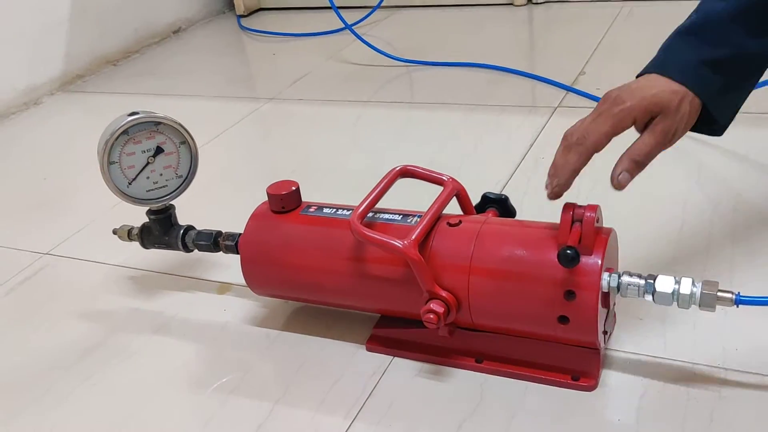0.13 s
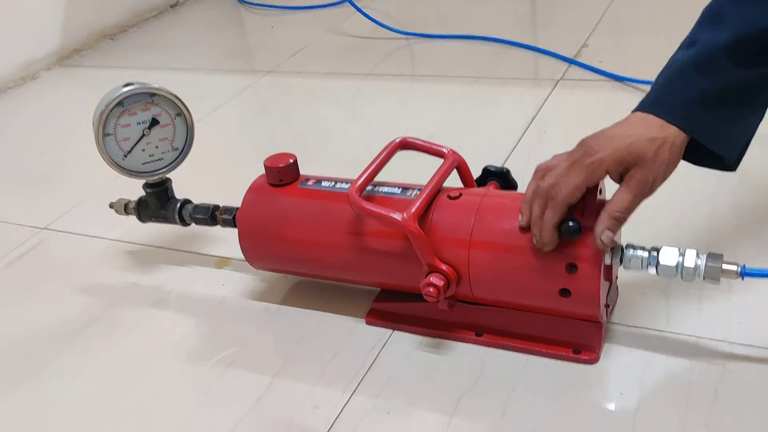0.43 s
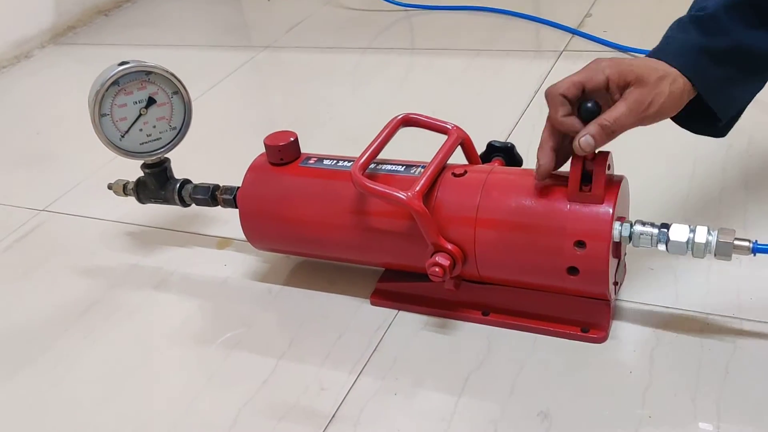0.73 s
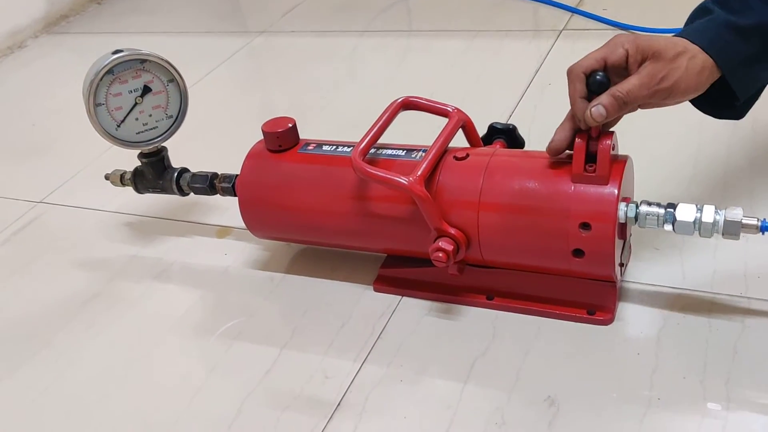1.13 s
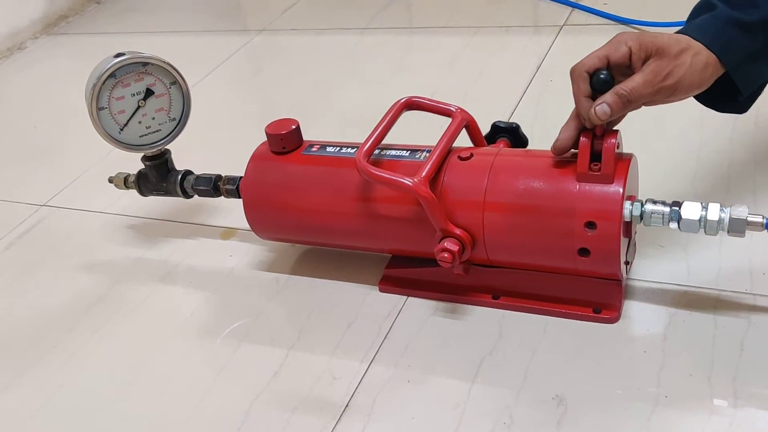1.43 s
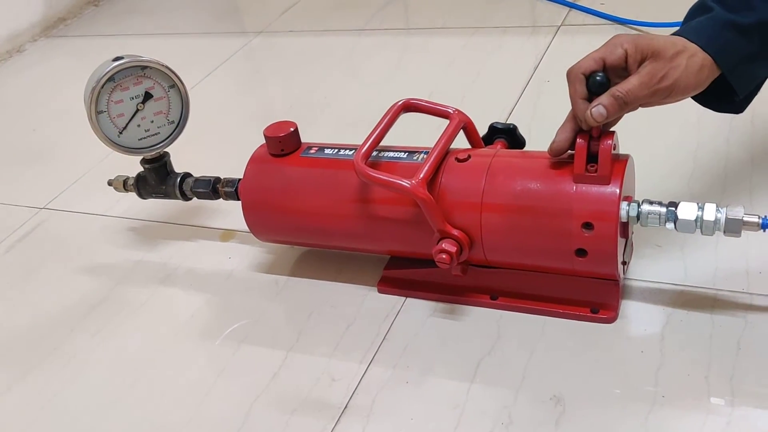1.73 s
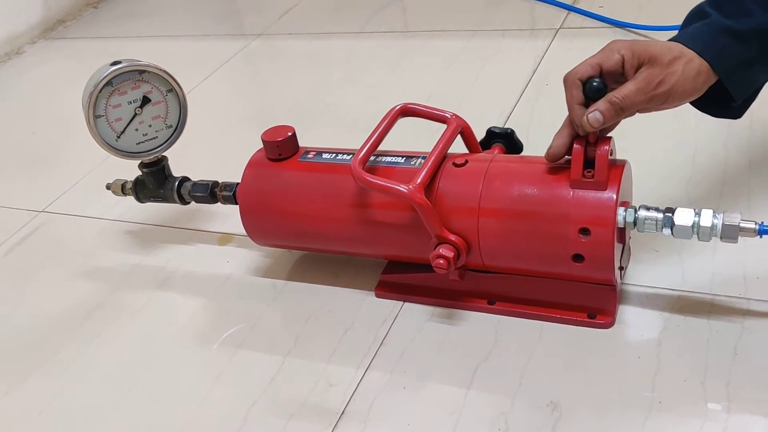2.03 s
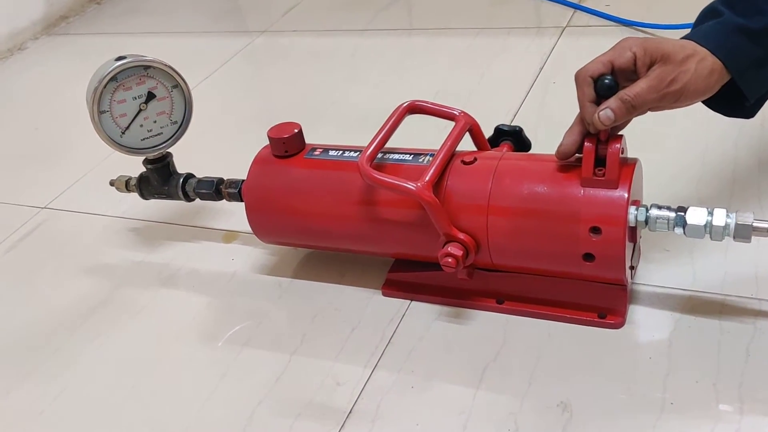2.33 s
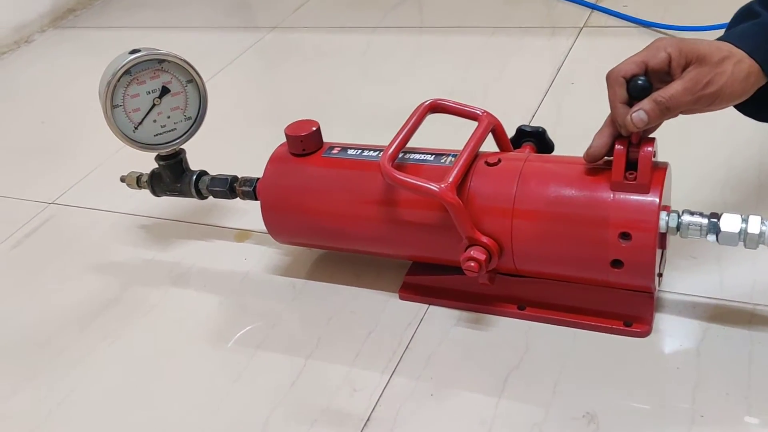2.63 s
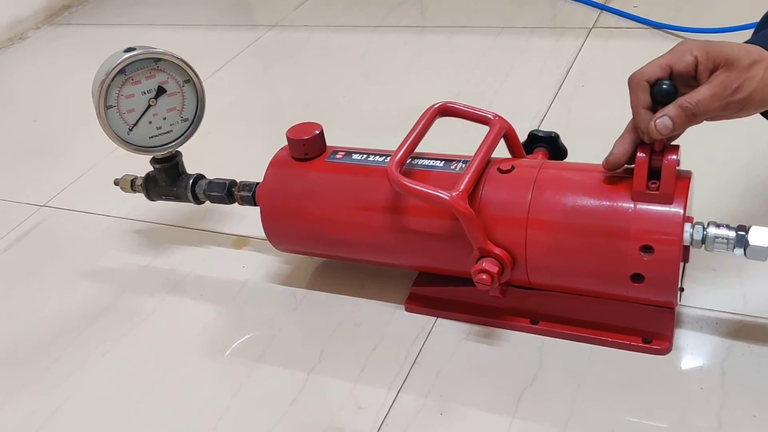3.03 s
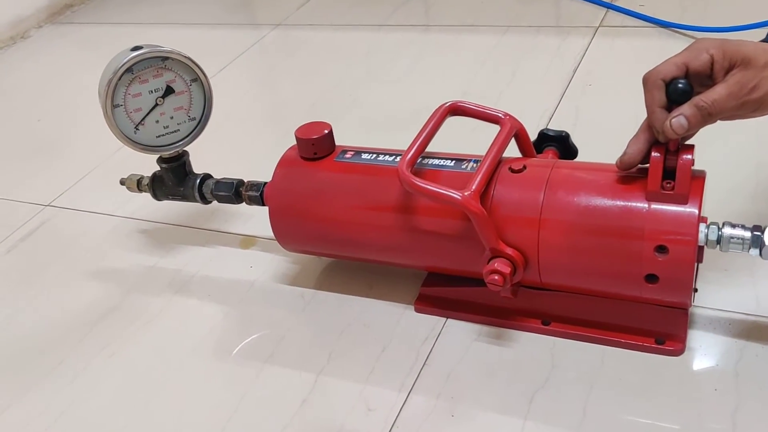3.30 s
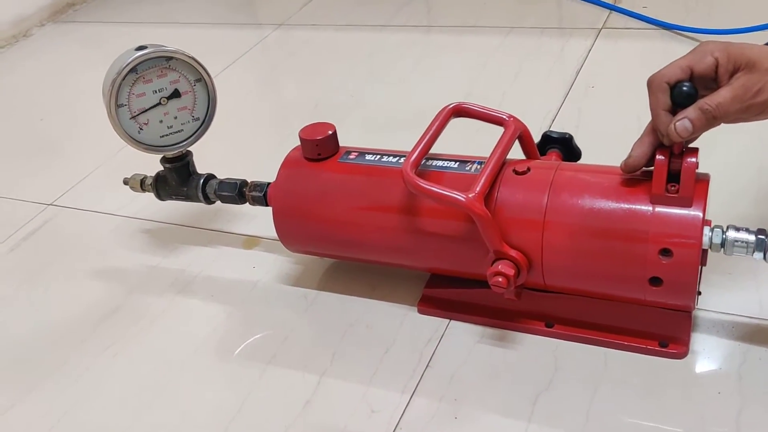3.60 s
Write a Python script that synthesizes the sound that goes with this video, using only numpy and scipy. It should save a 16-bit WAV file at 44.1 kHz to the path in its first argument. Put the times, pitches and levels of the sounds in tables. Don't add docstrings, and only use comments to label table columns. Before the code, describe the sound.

Low machinery hum and a soft cloth swish come first, then air rushes in and a pneumatic pump chugs loudly, about six strokes a second, echoing off tiles, with the phone microphone compressing each blast.

```python
import sys
import numpy as np
from scipy import signal
from scipy.fft import rfft, irfft, next_fast_len
from scipy.io import wavfile
from scipy.ndimage import uniform_filter1d

SR = 44100
rng = np.random.default_rng(int(sys.argv[2]) if len(sys.argv) > 2 else 0)


def voltage_ratio(level):
    return 10 ** (np.asarray(level, float) / 20)


def digitize_waveform(pressure):
    field = np.atleast_2d(pressure).T
    bounded = np.clip(field, -1, 1)
    quanta = np.round(bounded * 32767).astype(np.int16)
    wavfile.write(sys.argv[1], SR, quanta)


N = 165816
T = np.arange(N) / SR
KNOCK_DELAY_S = 0.038
HUSH_S = 0.02

# [f/Hz, level/dB per Hz]
ROOM_COLOUR = [(20, -18), (55, -12), (85, -25), (180, -13), (300, -12), (873, -22), (7950, -37),
               (16000, -58)]
# [f/Hz, width/Hz, level/dB]
MACHINE_TONES = [(30.5, 15, -46), (106, 14.3, -42.5), (130.5, 14.5, -41), (173, 31, -41.5),
                 (198, 30, -40.5), (391, 14, -49.5), (1900, 210, -56)]
# [t/s, f/Hz, level/dB]
MOTOR_LOAD = [(0.01, 202.6, -35), (0.066, 194, -46), (0.096, 192.8, -35.5), (0.29, 204.4, -28),
              (0.51, 201.8, -34.5), (0.6, 192, -38), (0.858, 198, -31.5), (1.089, 192, -38.5),
              (1.3, 200, -41), (2.3, 193.2, -39), (3.7, 196, -36)]
# [f/Hz, level/dB]
MACHINE_WHINES = [(279.9, -48), (323, -52), (382.2, -52), (532.9, -54), (1308, -53), (1938, -60),
                  (2035, -61)]
# [f/Hz, likeness/-1..1]
STEREO_LIKENESS = [(60, 0.96), (180, 1), (550, 0.55), (1650, -0.2), (4970, 0.035), (15000, -0.24)]
# [f/Hz, width/Hz, level/dB]
CLOTH = [(2630, 470, -3.5), (3560, 900, -3), (5600, 2900, -1), (8300, 1800, -2.5), (11900, 2400, -18)]
# [t/s, level/dB, f/Hz, t60/s]
DULL_TAPS = [
    (.508, -29, 753, 0.062),
    (1.4, -29, 620, .05),
    (3.596, -4, 980, 0.014),
    (4.4, -1, 1820, .02),
    (1.9, -18, 2400, .02),
]
# [f/Hz, width/Hz, level/dB]
SUPPLY_LINE = [(740, 290, -14.5), (2420, 1050, -10), (3840, 490, -0.5), (4830, 270, -11.5),
               (5900, 450, -11), (6960, 470, -8), (8300, 500, -14), (9180, 690, -4), (9500, 460, -10),
               (10500, 440, -19), (12240, 960, -13.5), (14500, 400, -28)]
# [blast t/s, blast level/dB, knock level/dB, groan level/dB, share of the usual fading]
PUMP_STROKES = [(1.2523, -1.5, 1.5, 4, 0.77), (1.4096, 0, -0.5, -3, 1.27), (1.5672, -2.5, -0.5, 4, 0.64),
                (1.7262, 1.5, 3, 4.5, 1.24), (1.8845, -0.5, -2, -4, 1.16), (2.0456, 0.5, 0, 0, 1.24),
                (2.2055, 2, 1, 3, 1.24), (2.3686, 1.5, 0.5, 3, 1.2), (2.5304, -0.5, 1.5, 2, 0.86),
                (2.6917, -1, 0, -1, 1.02), (2.857, 3.5, 2, 5, 1.21), (3.024, 1.5, 1, 2.5, 1.2),
                (3.194, 2.5, 2, 7, 1.19), (3.3774, 2, 0.5, 6, 1.14), (3.592, 3.5, -2, 3.5, 0.84)]
GROAN_ROUGHNESS = (.2, .4)
# [f/Hz, level/dB, t60/s]
BODY_MODES = [(158.5, -4.5, 0.047), (438.8, -12.5, 0.2), (502, -5, 0.034), (610, -5.5, 0.04),
              (773, 3, 0.014), (887, -1, 0.047), (929, 1, 0.03)]
# [delay t/s, level/dB]
WALL_ECHOES = [(0, 5), (.0078, 0), (.018, -6), (.031, -7), (.045, 1), (.054, -9), (.065, -3), (.085, -1),
               (.102, -6)]
# [f/Hz, level/dB per Hz]
JET_COLOUR = [(300, -14.5), (1350, -19), (1850, -12.5), (2900, -3.5), (4400, -4.5), (6000, -2.5),
              (9000, -1), (15000, -16)]
# [f/Hz, width/Hz, level/dB]
JET_WHISTLES = [(3010, 360, -23.5), (3870, 300, -22.5), (5570, 230, -21), (5860, 190, -20.5),
                (6590, 100, -20), (7820, 370, -39), (8200, 810, -18), (9200, 230, -30)]
# [f/Hz, fall/dB per s]
JET_FADE = [(500, 31), (1500, 48), (3000, 71), (6000, 53), (9000, 74.5), (14000, 86)]
SECOND_PUFFS = [1.3, 1.36, 0.81, 1.1, 0.35, 1.44, 0.9, 0.45, 1.3, 1.4, 0.93, 1.03, 0.69, 1.3, 0.5]
# [f/Hz, left level/dB, right level/dB]
MIC_PORTS = [(1880, -2.5, -1), (5030, -2, 2), (5740, 2.5, 2), (6580, 5, -0.5), (7400, -6, 5.5),
             (7940, -10, 9.5), (9700, -14, 4.5), (15200, -0.5, 9)]


def rms_one(x):
    return x / np.sqrt(np.mean(x ** 2) + 1e-20)


def at_hz(points, hz, index=1):
    points = np.array(points)
    return np.interp(np.log(hz), np.log(points[:, 0]), points[:, index])


def drift(rate):
    r = np.exp(-80 * np.pi * rate / SR)
    slow = signal.lfilter([1], [1, -2 * r, r * r], rng.standard_normal(N // 40 + 2002))[2000:]
    return np.interp(np.arange(N) / 40, np.arange(len(slow)), rms_one(slow))


def stereo_noise(spectrum_db):
    hz = np.arange(N // 2 + 1) * SR / N + 1
    mid, side = rfft(rng.standard_normal((2, N)))
    alike = np.clip(at_hz(STEREO_LIKENESS, hz), -1, 1)
    both = np.sqrt(1 + alike) * mid + np.sqrt(1 - alike) * side * [[1], [-1]]
    return irfft(voltage_ratio(spectrum_db(hz)) * both, N)


def resonant_noise(rows):
    def spectrum_db(hz):
        power = sum(voltage_ratio(2 * db) / width * np.exp(-2.8 * ((hz - centre) / width) ** 2)
                    for centre, width, db in rows)
        return 10 * np.log10(power * SR / 2 + 1e-20)
    return stereo_noise(spectrum_db)


def gliding_noise(hz, wobble, rough):
    turn = 2 * np.pi * np.cumsum(hz) / SR
    in_phase = 1 - rough + rough * drift(wobble)
    return in_phase * np.cos(turn) + rough * drift(wobble) * np.sin(turn)


def ring(clicks, hz, t60):
    r, w = voltage_ratio(-60 / (t60 * SR)), 2 * np.pi * hz / SR
    return signal.lfilter([0, np.sin(w)], [1, -2 * r * np.cos(w), r * r], clicks + 1e-18)


def clicks_at(seconds, db):
    out = np.zeros(N + SR)
    np.add.at(out, (np.ravel(seconds) * SR).astype(int), voltage_ratio(np.ravel(db)))
    return out[:N]


def stroke_clock(delay):
    s = np.array(PUMP_STROKES)[:, 0]
    k = np.clip(np.searchsorted(s + delay, T) - 1, 0, None)
    return np.clip(T - s[k] - delay, 0, None), k, np.append(s, 9.0)[k + 1] - T


def off_tiles(spectrum):
    tile_db, tile_t60_s = -6.5, 0.12
    age = T[:SR // 5]
    echoes = rms_one(rng.standard_normal((2, SR // 5)) * voltage_ratio(-60 * age / tile_t60_s)) * np.sqrt(5 / SR)
    return spectrum * (1 + voltage_ratio(tile_db) * rfft(echoes, N)) / np.sqrt(1 + voltage_ratio(2 * tile_db))


def hum():
    broad = voltage_ratio(-32.5) * rms_one(stereo_noise(lambda hz: at_hz(ROOM_COLOUR, hz)))
    broad = broad * voltage_ratio(0.11 * drift(1.6))
    s, hz, db = np.transpose(MOTOR_LOAD)
    motor = gliding_noise(np.interp(T, s, hz), wobble=5.9, rough=0.11)
    motor = voltage_ratio(np.interp(T, s, db) + 3.5) * motor
    whines = 0
    for line_hz, level_db in MACHINE_WHINES:
        line = np.array([gliding_noise(line_hz + 0 * T, wobble=2.3, rough=0.25) for _ in "LR"])
        whines = whines + voltage_ratio(level_db + 8) * line
    return broad + resonant_noise(MACHINE_TONES) + motor + whines


def swish():
    peak_s, rise_s, fall_s, cloth_db = 0.32, 0.075, 0.083, -41.5
    squeak_start_s, squeak_end_s, squeak_db = 0.19, 0.35, -47
    shape = np.exp(-np.abs(T - peak_s) / np.where(T < peak_s, rise_s, fall_s))
    flick_db = 1.5 * np.exp(-((T - 0.335) / 0.014) ** 2)
    cloth = voltage_ratio(cloth_db + flick_db + 1.3 * drift(6.3)) * shape * resonant_noise(CLOTH)
    gate = np.clip(np.minimum(T - squeak_start_s, squeak_end_s - T) / 0.038, 0, 1)
    squeak_hz = 3780 - 2600 * (T - squeak_start_s)
    squeak = [gliding_noise(squeak_hz, wobble=60.0, rough=1.0) for _ in "LR"]
    return cloth + voltage_ratio(squeak_db) * gate * squeak


def taps():
    return sum(ring(clicks_at([s], [db]), hz, t60) for s, db, hz, t60 in DULL_TAPS)


def inrush():
    start_s, rise_s, level_db = 1.132, 0.19, -27
    opening = np.clip((T - start_s) / rise_s, 0, 1) ** 0.32
    gate = opening * (T < PUMP_STROKES[0][0] + 0.003)
    catch_db = -6 * np.exp(-((T - 1.144) / 0.0048) ** 2)
    hiss = irfft(off_tiles(rfft(resonant_noise(SUPPLY_LINE))), N)
    return voltage_ratio(level_db + catch_db + 0.47 * drift(8.8)) * gate * hiss


def groan():
    level_db, start_hz, sag_hz_per_s, fade_db_per_s, pan_db = -31.5, 927, 900, 32, 8
    since, k, left = stroke_clock(KNOCK_DELAY_S)
    gate = np.clip(since / 0.0057, 0, 1) * np.clip((left - HUSH_S) / 0.0056, 0, 1)
    level = voltage_ratio(level_db + np.array(PUMP_STROKES)[k, 3] - fade_db_per_s * since) * gate
    hz = start_hz - sag_hz_per_s * since
    note = [gliding_noise(hz, wobble=29.0, rough=share) for share in GROAN_ROUGHNESS]
    return level * note * voltage_ratio([[pan_db], [-pan_db]])


def thumps():
    lead_s, level_db = 0.00395, -9.5
    s = np.array(PUMP_STROKES)[:, 0]
    return ring(clicks_at(s - lead_s, level_db + 0 * s), hz=128, t60=0.04)


def pump_body(clicks):
    pulse_db, top_hz = 32, 946
    steep = signal.cheby2(8, 30, top_hz * 1.12, fs=SR, output="sos")
    modes = sum(voltage_ratio(db) * (-1) ** j * ring(clicks, hz, t60) for j, (hz, db, t60) in enumerate(BODY_MODES))
    return signal.sosfilt(steep, -voltage_ratio(pulse_db) * clicks + modes)


def knocks():
    level_db, pan_db, lag_s = -17, 1, 0.0001
    room_db, room_t60_s, hush_db = -10, 1, -5
    s, _, db, _, _ = np.transpose(PUMP_STROKES)
    delay, echo_db = np.transpose(WALL_ECHOES)
    hit = s + KNOCK_DELAY_S
    arrival = hit[:, None] + delay
    arrival_db = db[:, None] + echo_db + rng.normal(0, 1.43, (len(s), len(delay)))
    near = np.array([pump_body(clicks_at(arrival + lag, arrival_db)) for lag in (lag_s, 0)])
    age = T[:SR // 2]
    tail = rng.standard_normal((2, SR // 2)) * voltage_ratio(-60 * age / room_t60_s)
    tail = tail * np.clip(age / 0.062, 0, 1) / np.sqrt(0.019 * SR)
    diffuse = signal.fftconvolve(pump_body(clicks_at(hit, db))[None], tail, axes=1)[:, :N]
    left = stroke_clock(KNOCK_DELAY_S)[2]
    level = voltage_ratio(level_db + hush_db * np.clip((HUSH_S - left) / 0.085, 0, 1))
    return level * (near * voltage_ratio([[pan_db], [-pan_db]]) + voltage_ratio(room_db) * diffuse * 3)


def exhaust():
    level_db, attack_s = -1.5, 0.0015
    spike_db, spike_s, afterblow_db, afterblow_s = 7, 0.0035, 2, 0.005
    puff_peak_db, puff_hz, puff_octaves, puff_s, puff_rise_s = 2.5, 3900, 1, 0.08, 0.012
    s, db, _, _, share = np.transpose(PUMP_STROKES)
    k = np.clip(np.searchsorted(s, T) - 1, 0, None)
    since = np.clip(T - s[k], 0, None)
    before = np.where(k > 0, T - s[k - 1], 9.0)
    opening = 1 - np.exp(-since / attack_s)
    jet = rms_one(stereo_noise(lambda hz: at_hz(JET_COLOUR, hz)))
    jet = jet + sum(resonant_noise([row]) * voltage_ratio(3.73 * drift(14.6)) for row in JET_WHISTLES)
    spectrum = off_tiles(rfft(jet))
    hz = np.arange(N // 2 + 1) * SR / N + 1
    centres = 300 * 2 ** np.arange(0, 6.1, 0.5)
    out, together = 0, drift(25)
    for j, centre in enumerate(centres):
        window = np.interp(np.log(hz), np.log(centres), np.arange(len(centres)) == j)
        band = irfft(spectrum * window, N)
        puff_db = puff_peak_db * np.exp(-(np.log2(centre / puff_hz) / puff_octaves) ** 2)
        puff_db = puff_db * np.array(SECOND_PUFFS)[k]
        fall = at_hz(JET_FADE, centre) * share[k]

        def shape(age):
            burst_db = spike_db * np.exp(-age / spike_s) + afterblow_db * np.exp(-age / afterblow_s)
            return voltage_ratio(burst_db - fall * age + puff_db * np.clip((age - puff_s) / puff_rise_s, 0, 1))

        level = opening * voltage_ratio(db[k]) * shape(since) + (1 - opening) * voltage_ratio(db[k - 1]) * shape(before)
        flutter_db = 0.82 * together + 1.13 * drift(10.6) + 0.25 * drift(2.2)
        out = out + band * level * voltage_ratio(flutter_db)
    return voltage_ratio(level_db) * out


def scene():
    return hum() + swish() + taps() + inrush() + groan() + thumps() + knocks() + exhaust()


def low_pass(x):
    return signal.sosfilt(signal.butter(12, 16350, fs=SR, output="sos"), x)


def record(dry):
    cutoff_hz, top_hz, top_db_per_khz = 16300, 15100, 15
    knee_db, squeeze, release_db_per_s = [[-17.5], [-18]], 0.61, 69.5
    sense_s, glide_s, ahead_s = 0.0018, 0.001, 0.0057
    size = next_fast_len(N + 4096)
    hz = np.arange(size // 2 + 1) * SR / size + 1
    ports_db = np.array([at_hz(MIC_PORTS, hz, index=1), at_hz(MIC_PORTS, hz, index=2)])
    ports_db = ports_db - top_db_per_khz * np.clip(hz - top_hz, 0, None) / 1000
    x = irfft(rfft(dry, size) * voltage_ratio(ports_db) * (hz < cutoff_hz), size)[:, :N]
    level_db = 10 * np.log10(np.abs(uniform_filter1d(x ** 2, int(sense_s * SR))) + 1e-12)
    release_db = release_db_per_s * T
    held_db = np.maximum.accumulate(level_db + release_db, axis=1) - release_db
    cut_db = uniform_filter1d(squeeze * np.clip(held_db - knee_db, 0, None), int(glide_s * SR))
    gain = voltage_ratio([-np.interp(T + ahead_s, T, c) for c in cut_db])
    mix = np.tanh(x * gain)
    return low_pass(mix)


dry = scene()
out = record(dry)
digitize_waveform(out)
```